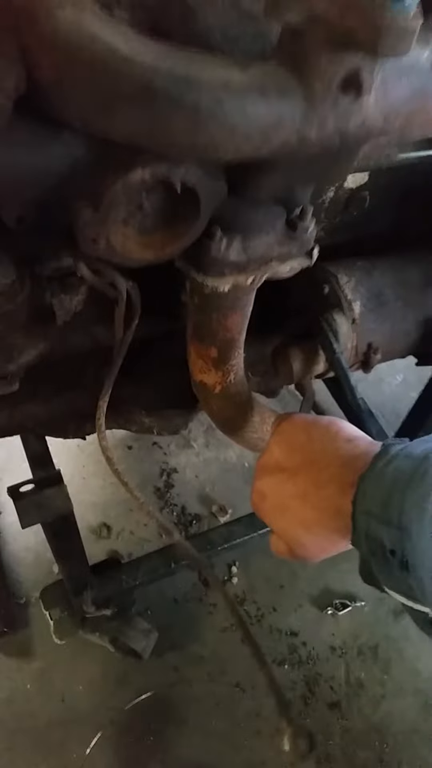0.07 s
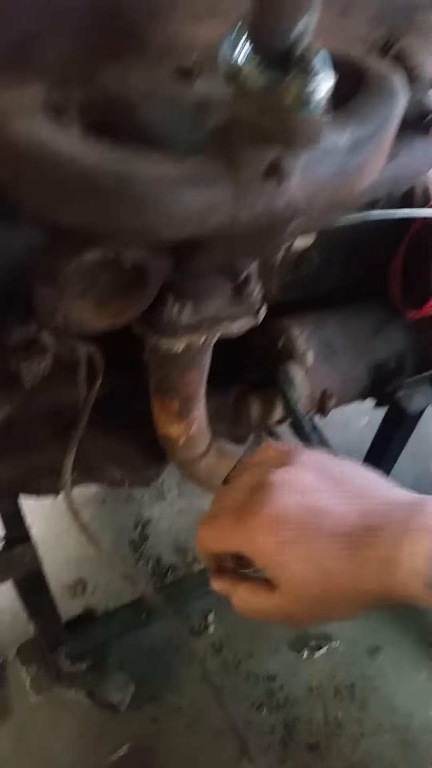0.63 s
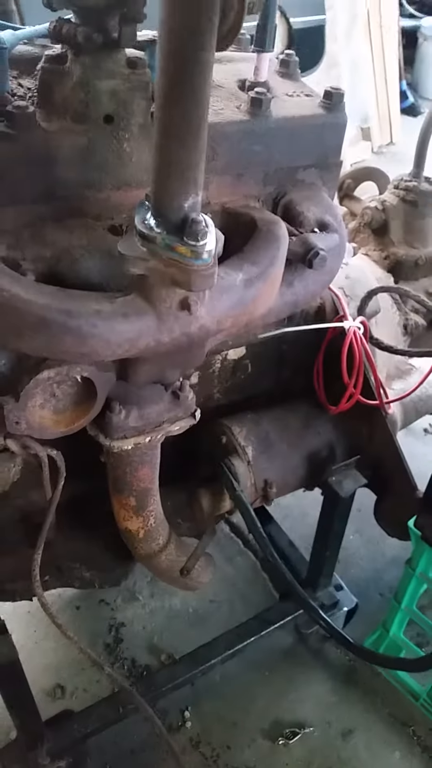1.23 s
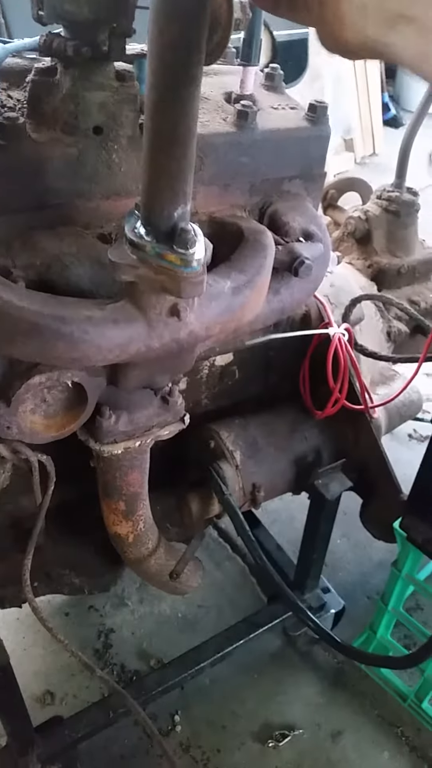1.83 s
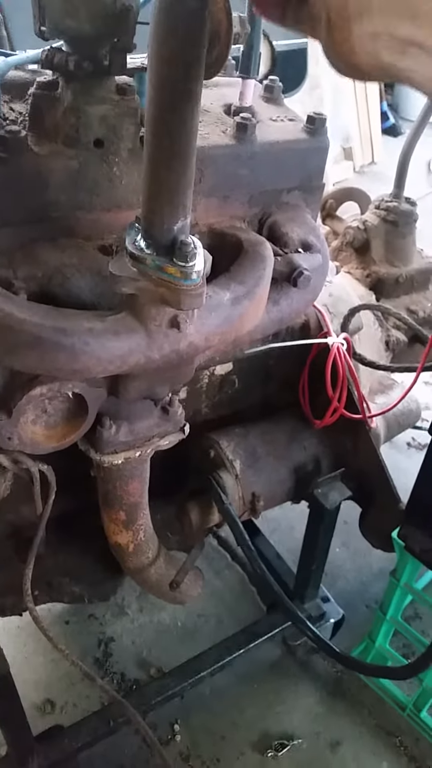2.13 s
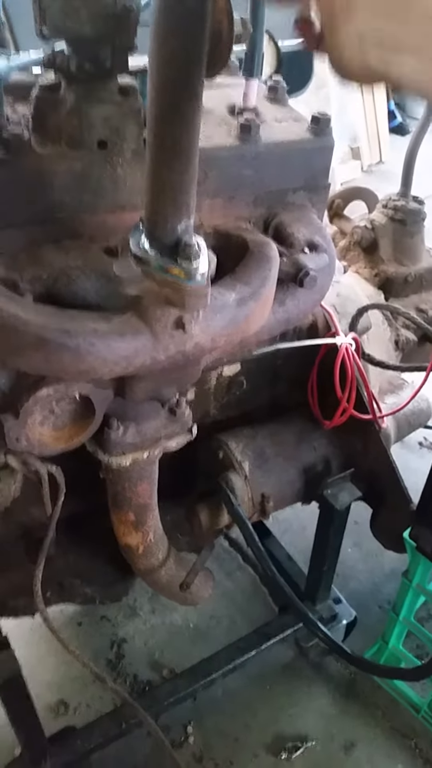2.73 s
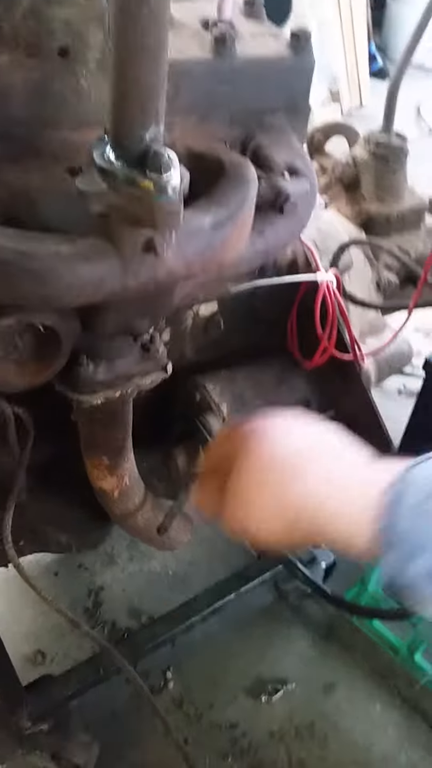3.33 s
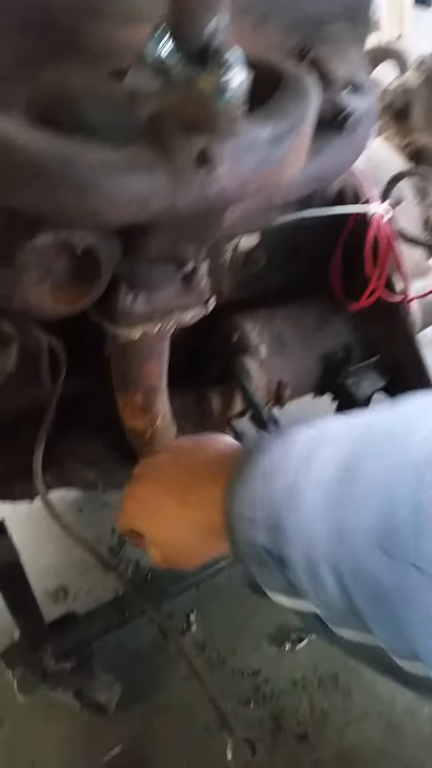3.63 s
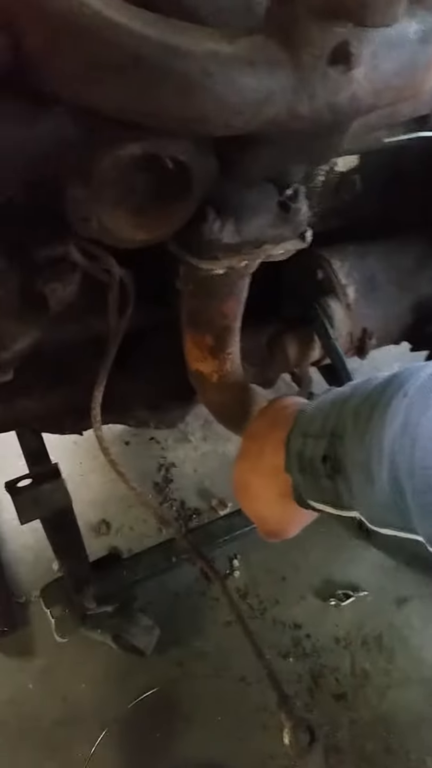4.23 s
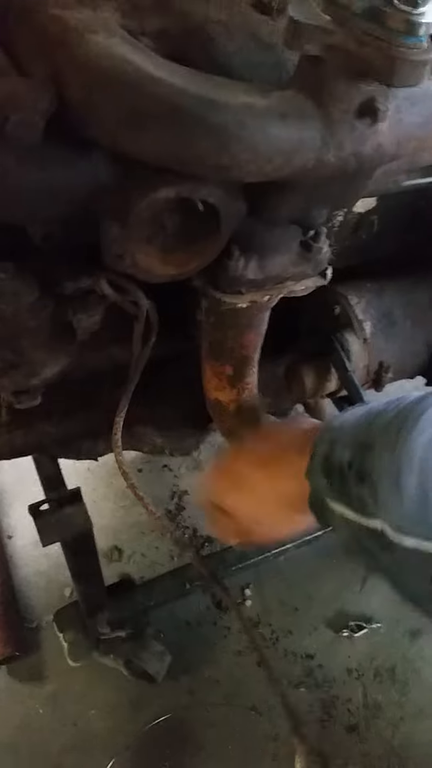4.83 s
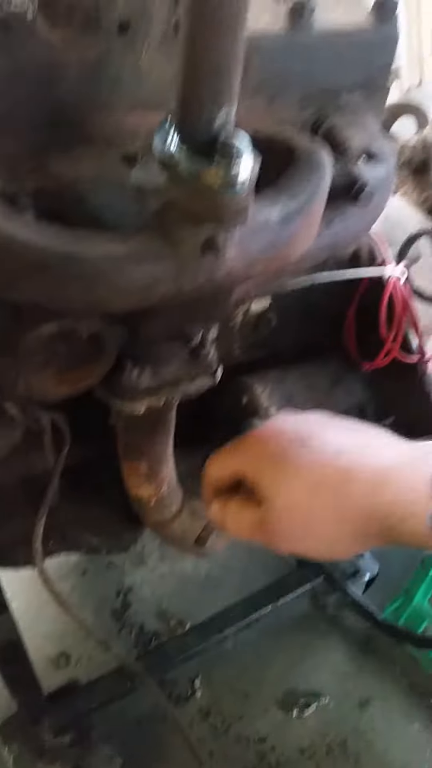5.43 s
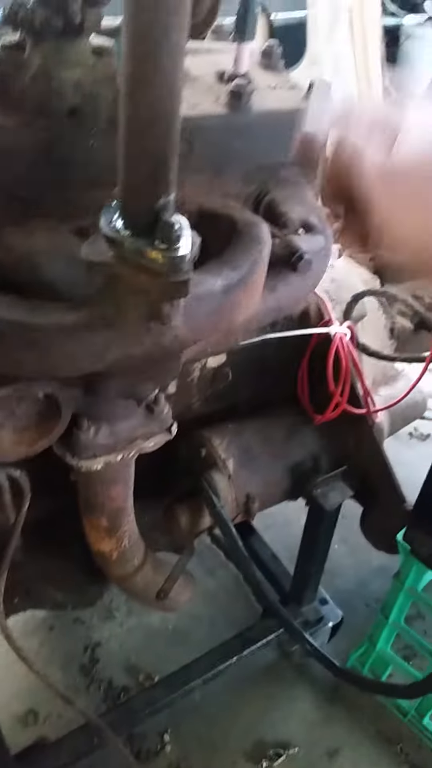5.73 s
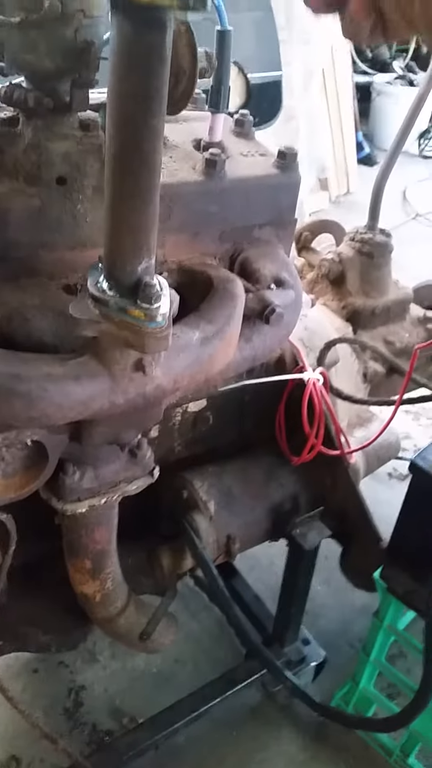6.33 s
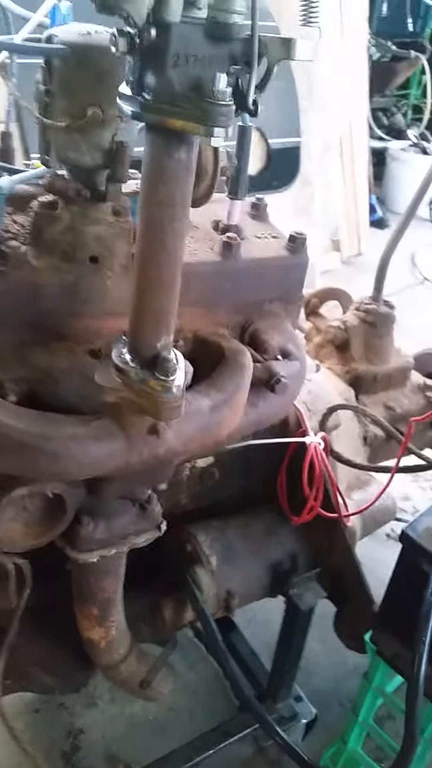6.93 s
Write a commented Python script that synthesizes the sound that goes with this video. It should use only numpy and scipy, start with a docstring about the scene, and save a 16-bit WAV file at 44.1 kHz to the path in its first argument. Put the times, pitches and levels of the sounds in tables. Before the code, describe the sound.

Close, lumpy exhaust thumping from an old engine that dies, pauses briefly, and restarts with a clank and grinding starter.

```python
"""A loping engine stalls and restarts

An old four-cylinder engine runs on a stand in a workshop, heard close to its open exhaust stub.
One cylinder hardly fires, so it lopes in threes: each firing releases a crack of gas and excites
a cavity resonance, a boom of rising pitch. The engine dies and creaks to rest by stick-slip
friction; the starter slams in and its teeth grind until the engine catches again."""
import sys
import numpy as np
from scipy import signal
from scipy.fft import rfft, irfft, next_fast_len
from scipy.io import wavfile

SR = 44100
rng = np.random.default_rng(int(sys.argv[2]) if len(sys.argv) > 2 else 0)


def store_wav(level_fs):
    """Save 16-bit WAV to argv[1]."""
    pcm = np.round(np.clip(np.atleast_2d(level_fs), -1, 1) * 32767)
    wavfile.write(sys.argv[1], SR, pcm.T.astype(np.int16))


N = 307818
T = np.arange(N) / SR
IDLE_STROKES_PER_S = 18

# crank speed until the stall, and from the restart on: (time [s], exhaust strokes [1/s])
SPEED_TO_STALL = [(.004, 10.47), (.09, 15.59), (.43, 17.79), (.81, 17.86), (.97, 15.56), (1.18, 16.27),
                  (1.47, 17.82), (1.76, 17.34), (2.16, 18.59), (2.49, 8.91), (2.68, 9.6), (2.85, 0)]
SPEED_FROM_RESTART = [(4.197, 8), (4.43, 5.06), (4.49, 12.44), (4.63, 9.92), (4.65, 13.71), (4.91, 17.18),
                      (5.02, 18.77), (5.26, 19.06), (5.42, 17.5), (5.81, 17.56), (5.89, 19.24),
                      (6.04, 17.85), (6.34, 18.76), (6.51, 16.74), (6.84, 18.3), (6.99, 16.61)]
# cylinders in firing order, the last weak: (boom [dB], boom decay [s], crack [dB], knock [dB])
CYLINDERS = [(1.5, 0.15, -2.5, 7.5), (2.3, 0.15, -2.5, 2.5), (0.5, 0.75, -0.5, 8), (-3.5, 0.1, -16, -2)]
# how hard the charges burn: (time [s], boom [dB], crack and knock [dB])
COMBUSTION = [(0, -21.5, -13), (.15, -17, -12.5), (.5, -15.5, -19), (.95, -18.5, -28), (1.15, -17, -18.5),
              (1.98, -17, -20.5), (2.12, -17.5, -8.5), (2.23, -17, -8), (2.36, -27, -28),
              (2.68, -44.5, -43), (4.2, -24.5, -34), (4.35, -35, -22), (4.48, -21.5, -10.5),
              (4.88, -16, -15), (5.35, -16.5, -24), (5.6, -17.5, -19.5), (6.5, -16.5, -20.5),
              (6.98, -16, -17.5)]
# charges that fail to burn: (time [s], change of boom [dB])
MISFIRES = [(.44, -0.5), (.67, 1), (1.14, -11.5), (1.38, -6), (1.61, 1), (1.84, 2), (2.17, -7), (5.57, 3.5)]
# strokes that knock hard: (time [s], level [dB])
HARD_KNOCKS = [(.08, -8.5), (.83, -3), (2.23, 1), (4.57, -2.5), (4.86, -5.5), (5.52, -9), (6.63, -5.5)]
# a last compression escapes unburnt: (time [s], duration [s], level [dB])
WHEEZES = [(2.535, 0.024, -33)]
# the starter is held in: (time [s], duration [s], level [dB])
CRANKINGS = [(0, 0.54, -22.5), (4.008, 0.87, -19)]
# the freed pinion rasps on the flywheel until thrown out: (time [s], duration [s], level [dB])
RASPS = [(.68, 0.29, -26), (5.16, 0.24, -25)]
# the crank rocks back, the starter gear hits the flywheel: (time [s], level [dB])
CLACKS = [(2.743, -40), (3.975, -19), (3.996, -26), (4.006, -3), (4.669, -12.5)]
# the lead spits as it touches the starter terminal: (time [s], level [dB])
SPARKS = [(3.979, -15.5), (4.007, -14.5), (4.104, -24), (4.393, -23), (4.456, -19)]
# the crank creaks to rest and scrapes back: (time [s], duration [s], level [dB])
CREAKS = [(2.855, 0.057, -40), (2.925, .04, -42), (3.045, 0.014, -46)]
SCRAPES = [(2.87, 0.12, -56), (2.97, 0.026, -44)]
# workshop background: (time [s], level [dB])
BACKGROUND_LEVEL = [(0, -30.5), (3.1, -57), (3.3, -57), (3.5, -49.5), (3.95, -37.5), (4.1, -43),
                    (6.98, -63)]

# resonances of the parts: (frequency [Hz], bandwidth [Hz], level [dB])
CASTING_MODES = [(682.4, 83.5, -6), (938, 190, -0.5), (1224, 103.6, 2), (1350, 150, -5), (1870, 164, -2),
                 (2064, 93, -7.5), (2680, 140, -3.5), (3195, 102, -7), (4320, 310, -20)]  # exhaust casting
HOUSING_MODES = [(678, 13, -4), (896, 76, 8.5), (1071, 130, 6.5), (1156, 20, 5.5), (1248, 51, 12.5),
                 (1385, 5, 10), (1833, 45, -0.5), (2303, 60, 1.5)]  # flywheel housing
STAND_MODES = [(221, 16, -5.5), (265, 11, -14), (325, 32, -0.5), (413.4, 18.7, 2), (486, 26, -7.5)]
BLOCK_MODES = [(337, 27, -2.5), (657, 87, -0.5), (1058, 70, -2), (1290, 68, -13), (1547, 99, -5.5)]
CREAK_MODES = [(624, 31, -1), (721, 22, -2), (726, 36, -13), (830, 87, -11.5), (1550, 160, -21.5)]
SCRAPE_MODES = [(1290, 68, 13.5), (1500, 260, 13), (2400, 210, 4), (2960, 300, -4)]  # rubbing iron
# spectra of the noises: (frequency [Hz], level [dB])
GAS_SPECTRUM = [(300, 2), (1000, -4.5), (2000, 3), (3800, -4), (6000, -3.5), (8500, -7.5), (11500, 1.5),
                (15500, 0.5)]
GRIND_SPECTRUM = [(80, -22), (300, -9), (520, -14.5), (620, -11), (900, -5), (1350, -8.5), (1600, -11.5),
                  (2400, -14.5), (3300, -20.5), (4200, -35), (5300, -31), (8000, -37), (12000, -33),
                  (16000, -38.5)]
CLATTER_SPECTRUM = [(160, -80.5), (280, 1), (373, -8), (533, -7.5), (664, -6), (786, -7.5), (1420, -14),
                    (1800, -7), (2030, -13.5), (3260, -18), (3490, -32), (5240, -22.5), (7470, -71.5),
                    (13100, -49.5), (16000, -108.5)]
BACKGROUND_SPECTRUM = [(18, -47), (30, -27.5), (44, 5.5), (106, 4), (229, -1), (267, -3.5), (435, -5),
                       (624, -6.5), (1930, -10), (2630, -17.5), (4180, -23), (7750, -44), (14000, -37)]
# workshop reverberation: (frequency [Hz], time to decay by 60 dB [s])
ROOM_T60 = [(100, 1), (400, 0.57), (2000, 0.74), (6000, 0.82), (15000, 0.47)]


def boom(times, dbs, decays, start_hz=80.8, climb=.26, late_climb=.3):
    """Helmholtz resonance of cylinder and stub: the rising piston shrinks the cavity, raising pitch."""
    out = np.zeros(N)
    gaps = np.diff(times, append=times[-1] + 1 / IDLE_STROKES_PER_S)
    lengths = np.minimum(gaps, .1)
    chances = rng.standard_normal((len(times), 3))
    for s, db, decay, length, chance in zip(times, dbs, decays, lengths, chances):
        t = T[:int(1.8 * length * SR)]
        travel = t / length
        hz = start_hz * (1 + .015 * chance[0]) * (1 + climb * travel + late_climb * travel ** 4)
        phase = 2 * np.pi * np.cumsum(hz) / SR
        valve = 1 / (1 + np.exp((travel - 1.05) / .05))  # shuts as the stroke ends
        leak = .4 * (1 - valve) * np.minimum((1.8 - travel) / .7, 1) ** 2
        envelope = np.minimum(t / .0058, 1) * np.exp(-t / decay) * (valve + leak)
        # a fainter overtone rings above each boom
        overtone_db = min(-27 + .35 * (db + 17.5), db - 12) + 2 * chance[2]
        overtone = undb(overtone_db) * np.sin(2.15 * phase + 2 * chance[1])
        add(out, s - .0025, envelope * (valve * overtone - undb(db) * np.sin(phase)))
    return signal.sosfilt(signal.butter(4, 44, "high", fs=SR, output="sos"), out)


def exhaust(times, dbs, decays, boom_db=8, flow_db=-24):
    """Turbulence at the open end adds a low flutter to the cavity resonance."""
    flow = bursts(times, dbs, rise_s=.004, fall_s=.05) * rng.standard_normal(N)
    flutter = colour(flow, [(20, -22), (55, -4), (160, 0), (260, -7), (380, -10), (480, -8),
                            (600, -18), (2000, -70)])
    return undb(boom_db) * boom(times, dbs, decays) + undb(flow_db) * flutter


def gas_cracks(times, dbs, crack_db=3, trail_db=-19):
    """Jet noise: each opening valve releases a crack and a trailing hiss; unburnt gas only wheezes."""
    jet = bursts(times - .001, dbs + crack_db, rise_s=.006, fall_s=.004)
    hiss = bursts(times, dbs + trail_db, rise_s=.0088, fall_s=.039)
    wheeze = swells(WHEEZES, attack_s=.009, release_s=.015)
    return colour((jet + hiss + wheeze) * rng.standard_normal(N), GAS_SPECTRUM)


def knocks(times, dbs, rise_s=.0059, detune=.033):
    """Pressure steps excite damped modes of the casting and its gas, which vary with the heat."""
    out, t = np.zeros(N), T[:SR // 12]
    hz, width, mode_db = np.transpose(CASTING_MODES)[:, :, None]
    chances = rng.standard_normal((len(times), 3, len(CASTING_MODES), 1))
    for s, db, chance in zip(times, dbs, chances):
        envelopes = undb(mode_db + 2.5 * chance[0]) * np.exp(-np.pi * width * t)
        modes = envelopes * np.sin(2 * np.pi * (hz * (1 + detune * chance[1]) * t + chance[2]))
        add(out, s - .0005, undb(db) * np.minimum(t / rise_s, 1) * modes.sum(axis=0))
    return out


def speed(run):
    """Stroke rate [1/s] during one run of the engine, zero outside it."""
    return np.interp(T, *np.transpose(run), left=0, right=0)


def valve_openings(run, first_cylinder):
    """The integral of the stroke rate gives the time and cylinder of each valve opening."""
    turned = np.cumsum(speed(run)) / SR
    stroke = np.arange(int(turned[-1]) + 1)
    return T[np.searchsorted(turned, stroke, side="right")], (stroke + first_cylinder) % len(CYLINDERS)


def exhaust_strokes(boom_scatter_db=1.24, crack_scatter_db=2, knock_scatter_db=3.5, puff_db=-38):
    """Cyclic variation: cylinder, combustion and chance set the strength of each stroke."""
    runs = valve_openings(SPEED_TO_STALL, 0), valve_openings(SPEED_FROM_RESTART, 3)
    times, cylinder = map(np.concatenate, zip(*runs))
    boom_db, decay, crack_db, knock_db = np.array(CYLINDERS, float)[cylinder].T
    at, fullness, sharpness = np.transpose(COMBUSTION)
    chance = rng.standard_normal((len(times), 3)).T
    boom_db += np.interp(times, at, fullness) + boom_scatter_db * chance[0]
    crack_db += np.interp(times, at, sharpness) + crack_scatter_db * chance[1]
    knock_db += np.interp(times, at, sharpness) + knock_scatter_db * chance[2]
    for s, db in MISFIRES:
        nearest = np.argmin(abs(times - s))
        boom_db[nearest] += db
        crack_db[nearest] = knock_db[nearest] = puff_db
    for s, db in HARD_KNOCKS:
        knock_db[np.argmin(abs(times - s))] = db
    return times, boom_db, decay, crack_db, knock_db


def starter(mesh_hz=114, growl_db=-8.5, heave_db=11, heave_s=.44):
    """Gear noise: worn teeth modulate friction at the mesh rate and force housing and stand to ring."""
    mesh_cycles = np.cumsum(mesh_hz * (1 + .0199 * walk(18))) / SR
    teeth = unit(np.exp(np.cos(2 * np.pi * mesh_cycles)) * undb(2 * walk(40)))
    grind = undb(1) * colour(teeth * grains(5000, 4.7), GRIND_SPECTRUM)
    grind += undb(-3) * ring(teeth * grains(1500, .79), HOUSING_MODES)
    growl = ring(grains(3000, .8), STAND_MODES)
    scrape = undb(-8) * ring(teeth * grains(2000, 1.8), SCRAPE_MODES)
    # the grinding eases as the engine picks up, and runs down when let go
    held = swells(CRANKINGS, attack_s=.0022, release_s=.2, slope_db_per_s=-10)
    rasp = swells(RASPS, attack_s=.01, release_s=.012, slope_db_per_s=26.5)
    # heaving the crank from rest shakes the stand harder
    since_restart = T - CRANKINGS[-1][0]
    heave = (since_restart > 0) * np.exp(-(since_restart / heave_s) ** 2)
    shaking = held * undb(growl_db + heave_db * heave) + rasp * undb(-10)
    return (held + rasp) * grind + rasp * scrape + shaking * growl


def clacks(stand_db=-5):
    """Impacts of iron on iron radiate broadband noise and excite the modes of the stand."""
    blow = bursts(*np.transpose(CLACKS), rise_s=.0006, fall_s=.009) * rng.standard_normal(N)
    iron = colour(blow, [(80, -32), (200, -20.5), (400, 5), (1200, 13.5), (2600, 4), (4500, -14),
                         (8000, -38), (15000, -36)])
    return iron + undb(stand_db) * ring(blow, STAND_MODES)


def sparks():
    """Short electric arcs heat the air abruptly and radiate a fizz."""
    arcs = bursts(*np.transpose(SPARKS), rise_s=.0016, fall_s=.0024)
    return colour(arcs * grains(10000, 1.1), GAS_SPECTRUM)


def clatter(gain_db=-31.5, rattle_db_per_decade=35, rub_db_per_decade=21):
    """Impact noise of tappets and chain and friction noise of bearings grow as powers of the speed."""
    rattle = undb(2 * walk(35) - 2.5) * colour(grains(4000, 1.2), CLATTER_SPECTRUM)
    rub = undb(1.8 * walk(25) - 5) * ring(grains(3000, .5), BLOCK_MODES)
    rub += undb(-19) * colour(rng.standard_normal(N), GAS_SPECTRUM)  # gas hissing past the pistons
    pace = (speed(SPEED_TO_STALL) + speed(SPEED_FROM_RESTART)) / IDLE_STROKES_PER_S
    turning = np.minimum(pace * 2, 1) ** 2
    rattle *= pace ** (rattle_db_per_decade / 20)
    rub *= pace ** (rub_db_per_decade / 20)
    return undb(gain_db) * turning * (rattle + rub)


def creak(slip_hz=620):
    """Stick-slip friction: a dry part squeaks at the end of the last turn, then scrapes back."""
    slip_cycles = np.cumsum(slip_hz * (1 + .048 * walk(120))) / SR
    slips = np.diff(np.floor(slip_cycles), prepend=0)
    friction = .084 * unit(slips - slips.mean()) + rng.standard_normal(N)
    squeak = unit(ring(friction, CREAK_MODES)) * swells(CREAKS, attack_s=.014, release_s=.0089)
    rubbing = ring(grains(2200, 4.9), SCRAPE_MODES)
    scrape = unit(colour(rubbing, [(600, -12.5), (1200, -13), (3200, 2), (4500, -22)]))
    return squeak + scrape * swells(SCRAPES, attack_s=.0096, release_s=.022)


def standing_wave(bass, mode_hz=92, decay_s=.21):
    """Forced resonance: the boom keeps one mode of the room going."""
    t = T[:2 * SR]
    mode = np.cos(2 * np.pi * mode_hz * t) * np.exp(-t / decay_s)
    return signal.fftconvolve(bass, mode)[:N] / (SR / 200)


def reverberation(x, build_s=.0074):
    """Reflections from floor and walls form a diffuse field, alike at both ears only in the bass."""
    t, hz = T[:SR], np.fft.rfftfreq(SR, 1 / SR)
    mid, side = rfft(rng.standard_normal((2, SR)))
    spread = np.minimum(hz / 700, 1)
    field = (mid + spread * side * np.array([[1], [-1]])) / np.sqrt(1 + spread ** 2)
    response = 0
    for band_hz, t60 in ROOM_T60:
        band = over_pitch([(f, f == band_hz) for f, _ in ROOM_T60], hz)
        response += irfft(field * band, SR) * undb(-60 * t / t60)
    early_boost = 1 + 7.7 * np.exp(-t / .0054)
    response *= np.minimum(t / build_s, 1) * early_boost
    return signal.fftconvolve(x[None], unit(response) / np.sqrt(SR), axes=1)[:, :N]


def background():
    """Dull ambient noise, coherent between the ears in the bass; it fades, then swells in the pause."""
    mid, side = (colour(rng.standard_normal(N), BACKGROUND_SPECTRUM) for _ in range(2))
    side = signal.sosfilt(signal.butter(1, 500, "high", fs=SR, output="sos"), side)
    level_db = np.interp(T, *np.transpose(BACKGROUND_LEVEL)) + .8 * walk(9)
    return undb(level_db) * (mid + .8 * side * np.array([[1], [-1]]))


def undb(db):
    """Decibels to amplitude ratio."""
    return 10 ** (np.asarray(db) / 20)


def unit(x):
    """Normalisation to rms 1."""
    return x / np.sqrt(np.mean(x ** 2))


def over_pitch(rows, hz):
    """Interpolation of (frequency [Hz], value) rows on a logarithmic axis."""
    f, value = np.transpose(rows)
    return np.interp(np.log(hz + 1), np.log(f), value)


def colour(x, spectrum):
    """Filtering by (frequency [Hz], level [dB]) rows; white noise keeps its power."""
    size = next_fast_len(N + 4096)
    gain = unit(undb(over_pitch(spectrum, np.fft.rfftfreq(size, 1 / SR))))
    return irfft(rfft(x, size) * gain, size)[..., :N]


def ring(x, modes):
    """Convolution with a sum of damped modes; white noise keeps its power."""
    t = T[:SR // 4]
    response = sum((-1) ** k * undb(db) * width * np.exp(-np.pi * width * t) * np.cos(2 * np.pi * hz * t)
                   for k, (hz, width, db) in enumerate(modes))
    return signal.fftconvolve(x, response / np.linalg.norm(response))[:N]


def walk(knots_per_s):
    """Continuous random fluctuation with a spread near 1."""
    knots = rng.standard_normal(4096)
    return np.interp(T * knots_per_s, np.arange(len(knots)), knots)


def grains(per_s, spread_db):
    """Shot noise: tiny impacts of random time and size."""
    impacts = (rng.random(N) < per_s / SR) * rng.standard_normal(N)
    return unit(impacts * undb(spread_db * rng.standard_normal(N)))


def bursts(times, dbs, rise_s, fall_s):
    """Envelope of transients with linear rise and exponential decay."""
    out, t = np.zeros(N), T[:SR // 8]
    shape = np.minimum(t / rise_s, 1) * np.exp(-np.maximum(t - rise_s, 0) / fall_s)
    for s, db in zip(times, dbs):
        add(out, s - rise_s / 2, undb(db) * shape)
    return out


def swells(rows, attack_s, release_s, slope_db_per_s=0):
    """Envelope of (time [s], duration [s], level [dB]) events: attack, sloping hold, release."""
    out = np.zeros(N)
    for s, length, db in rows:
        t = np.maximum(T - s, 0)
        hold = undb(db + slope_db_per_s * np.minimum(t, length))
        out += hold * np.minimum(t / attack_s, 1) * np.exp(-np.maximum(t - length, 0) / release_s)
    return out


def add(out, s, sound):
    """Superposition of a sound at time s."""
    start = int(np.clip(s * SR, 0, N - 1))
    out[start:start + len(sound)] += sound[:N - start]


def direct(x, left_db, lag_samples):
    """Level and time differences give direction: the left is louder, the right lags."""
    return np.array([x * undb(left_db / 2), np.pad(x, (lag_samples, 0))[:N] * undb(-left_db / 2)])


def scene():
    """Direct and reverberant fields add: the exhaust is close by, the machinery more diffuse."""
    times, boom_dbs, decays, crack_dbs, knock_dbs = exhaust_strokes()
    bass = exhaust(times, boom_dbs, decays)
    crack = gas_cracks(times, crack_dbs) + sparks()
    knock = undb(2) * knocks(times, knock_dbs)
    machine = starter() + clacks() + clatter() + creak()
    near = direct(bass + undb(-32) * standing_wave(bass), left_db=1.06, lag_samples=0)
    near += direct(crack, left_db=5, lag_samples=21)
    near += direct(knock, left_db=0, lag_samples=3)
    near += undb(-1) * direct(machine, left_db=1, lag_samples=9)
    room = undb(-24) * reverberation(bass)
    room += reverberation(undb(-4) * crack + undb(-3) * (knock + machine))
    return near + room + background()


def record(dry, top_hz=16000):
    """Soft saturation rounds the highest peaks; a low-pass filter cuts the top."""
    rounded = dry / (1 + dry ** 6) ** (1 / 6)
    return signal.sosfilt(signal.ellip(8, .2, 70, top_hz, fs=SR, output="sos"), rounded)


dry = scene()
out = record(dry)
store_wav(out)
```